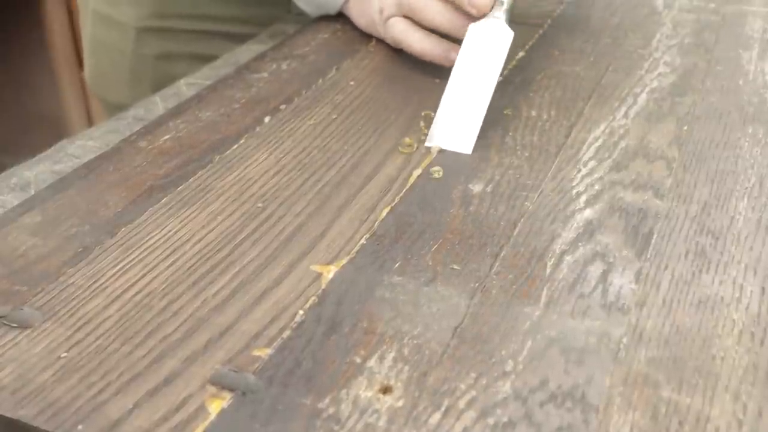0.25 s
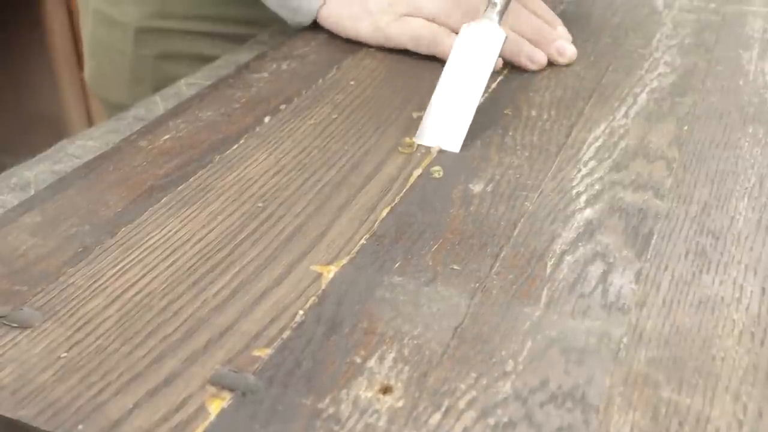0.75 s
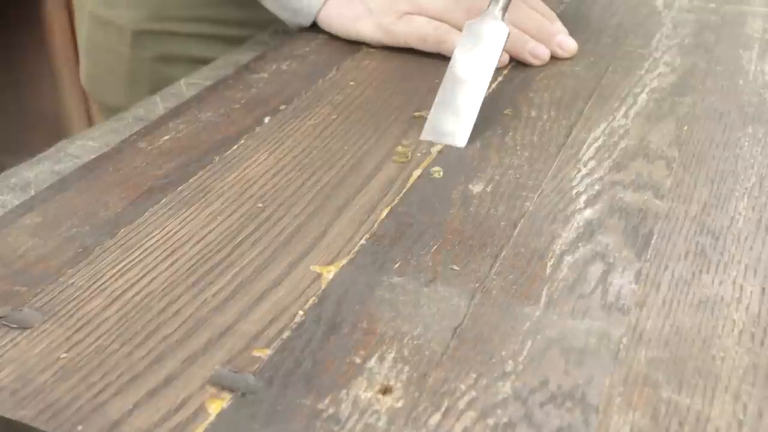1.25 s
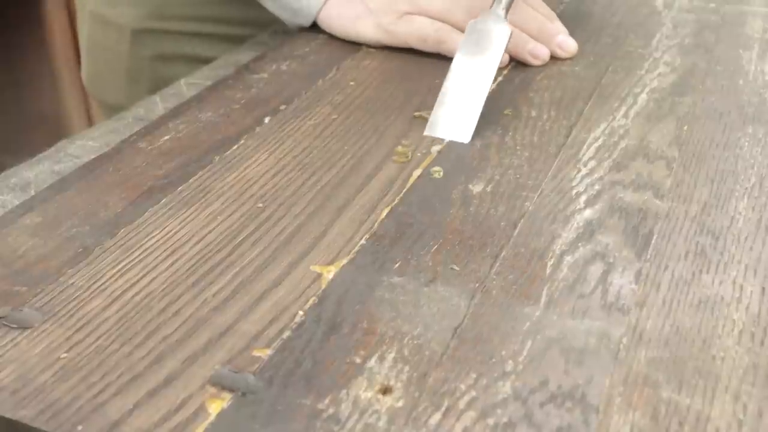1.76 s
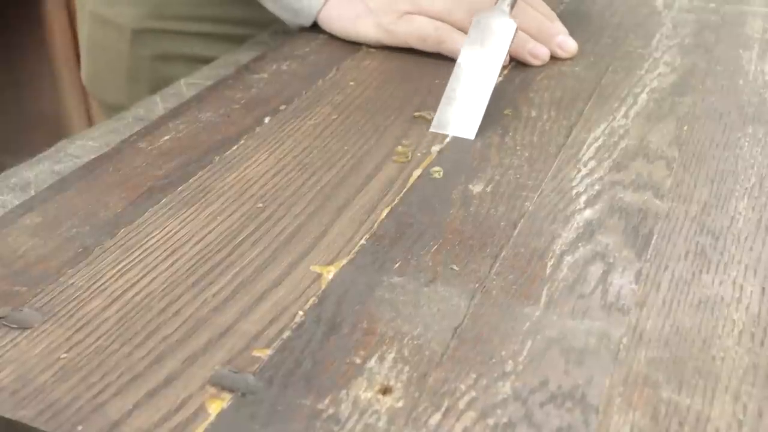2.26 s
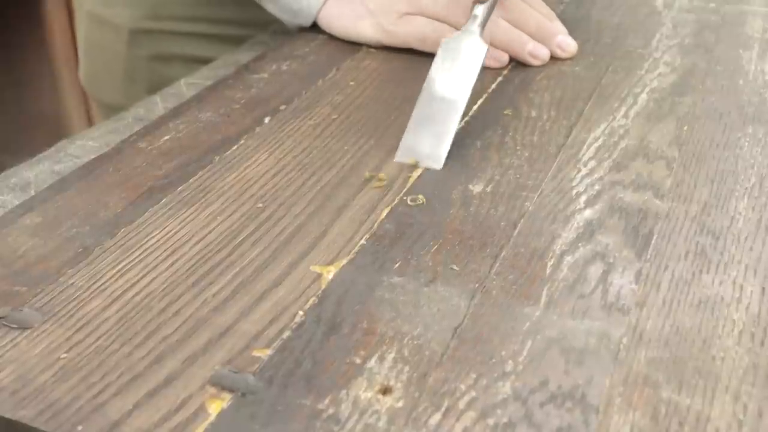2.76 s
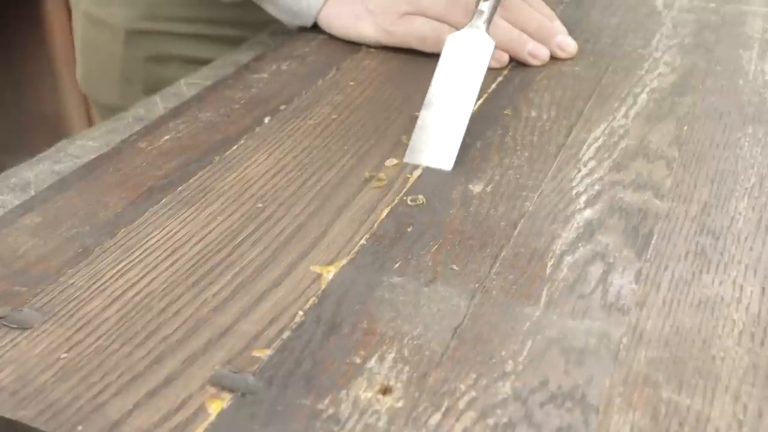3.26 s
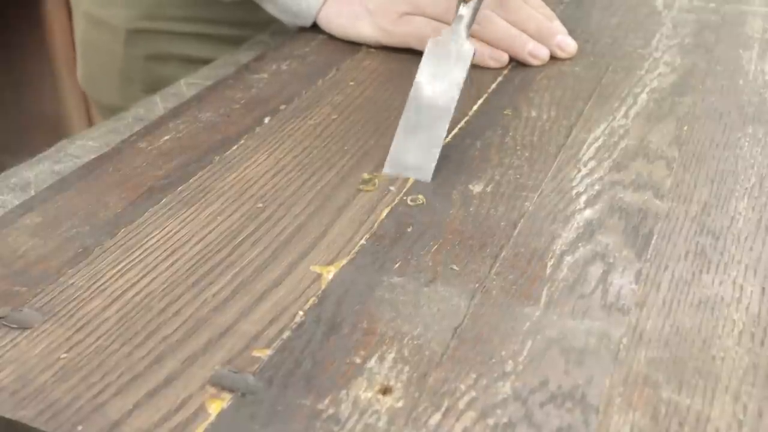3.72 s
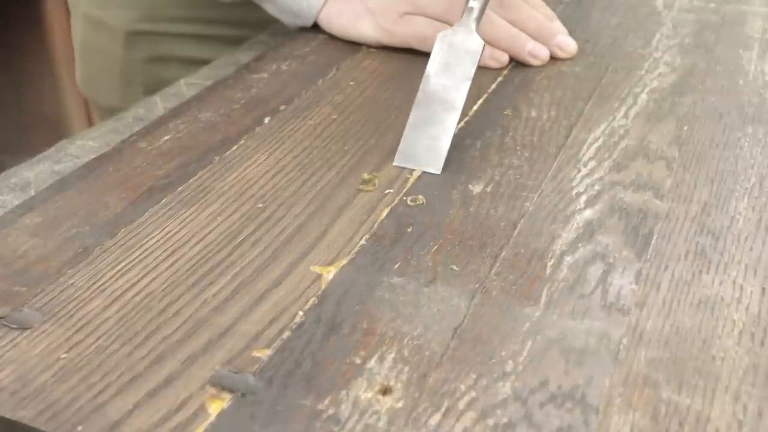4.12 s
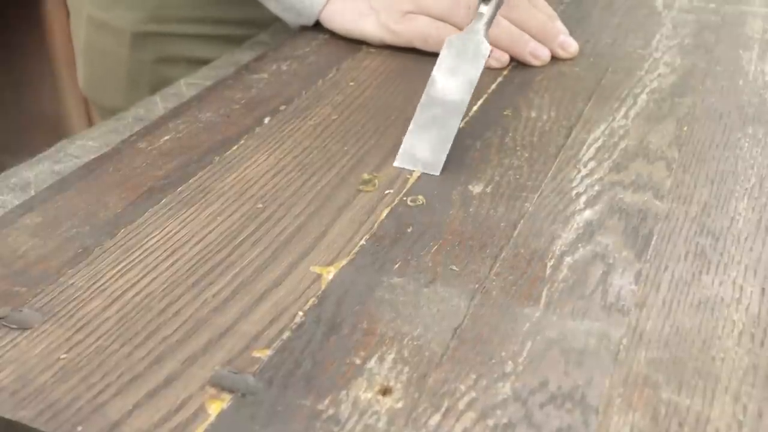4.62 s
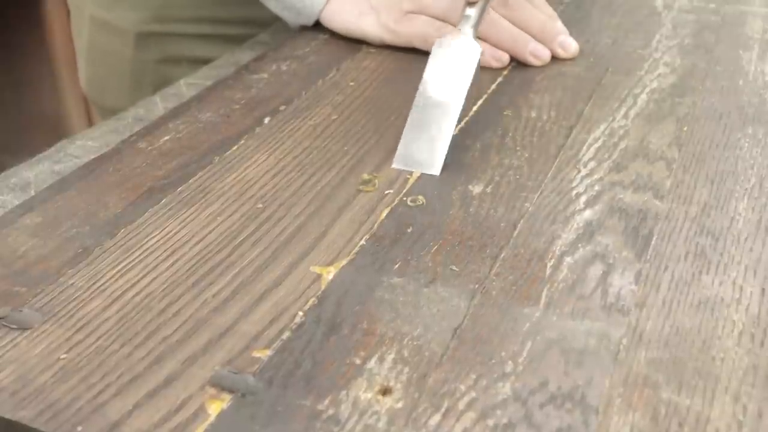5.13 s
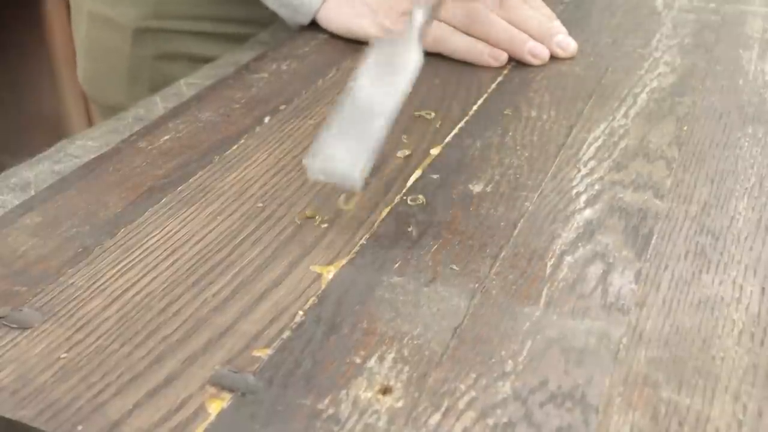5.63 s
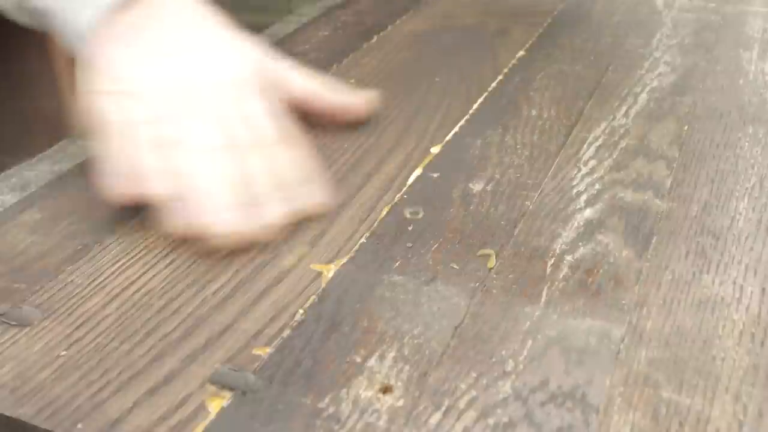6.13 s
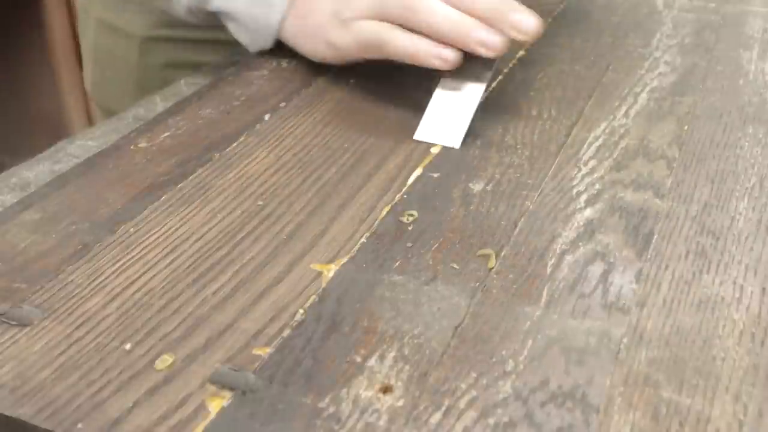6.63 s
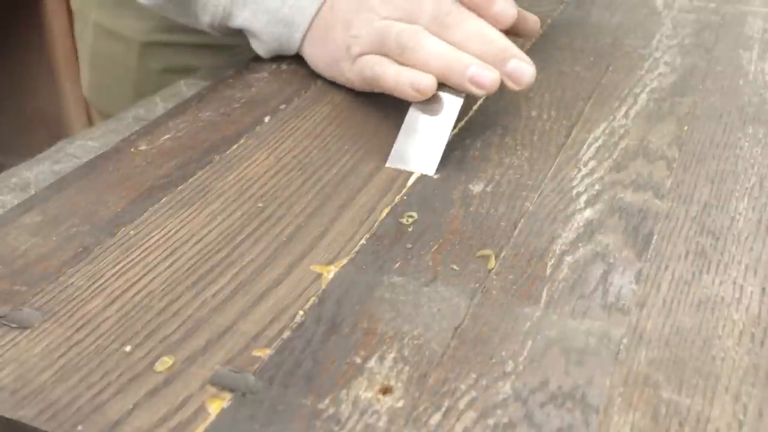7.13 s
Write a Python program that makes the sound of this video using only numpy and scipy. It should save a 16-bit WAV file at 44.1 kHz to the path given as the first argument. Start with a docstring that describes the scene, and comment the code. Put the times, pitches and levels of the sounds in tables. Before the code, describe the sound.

A steel scraper knocks and rasps in quick, regular strokes on a hollow wooden board, then slows, breaks free, and a palm brushes crumbs away.

```python
"""Scraping dried glue off a table leaf

A steel blade is pushed again and again into a bead of dried glue on a wooden leaf: it rasps, knocks and is
dragged back. Gritty noise and short strokes ring a bank of board modes; glue snaps and crumbles as bright noise.
Later the table booms once, as a dying low tone, and a palm sweeps the crumbs away, as swelling hiss.
A workshop hums behind in shaped noise; two close microphone ports hear it all almost alike."""
import sys
import numpy as np
from scipy import signal
from scipy.fft import rfft, irfft, next_fast_len
from scipy.io import wavfile
from scipy.ndimage import uniform_filter1d, map_coordinates

SR = 44100
rng = np.random.default_rng(int(sys.argv[2]) if len(sys.argv) > 2 else 0)


def file_out(sig):
    """Save sig as 16-bit WAV at sys.argv[1]."""
    # one column per channel
    cols = np.atleast_2d(sig).T
    # limit, then scale
    lim = np.clip(cols, -1, 1)
    pcm = np.round(lim * 32767).astype(np.int16)
    wavfile.write(sys.argv[1], SR, pcm)


N = 325458  # length in samples


def amp(db):
    """Turn dB into an amplitude factor."""
    return 10 ** (np.asarray(db) / 20)


def unit(x):
    """Scale a signal to an rms of 1."""
    return x / np.sqrt(np.mean(x ** 2) + 1e-20)


def along(points, hz):
    """Read a curve of (Hz, value) points at the given frequencies, on a log frequency axis."""
    f, v = np.transpose(points)
    return np.interp(np.log(hz + 1), np.log(f + 1), v)


def wobble(rate):
    """A smooth random curve with this many random knots a second."""
    knots = rng.standard_normal(int(N * rate / SR) + 4)
    return map_coordinates(knots, [np.arange(N) * rate / SR])


def filtered(x, response):
    """Multiply the spectrum of x by a complex response, given as a function of frequency."""
    n = x.shape[-1]
    m = next_fast_len(n + SR // 8)  # spare room for the ringing
    spectrum = rfft(x, m) * response(np.fft.rfftfreq(m, 1 / SR))
    return irfft(spectrum, m)[..., :n]


def coloured(spectrum, size):
    """Noise of rms 1, shaped by a spectrum of (Hz, dB) points."""
    noise = rng.standard_normal(size)
    return unit(filtered(noise, lambda hz: amp(along(spectrum, hz))))


def grit(size, spiky_db):
    """The edge skips over wood grain: noise whose samples scatter widely in size, in short clumps."""
    clumps = uniform_filter1d(rng.standard_normal(size), size=40)
    return unit(rng.standard_normal(size) * amp(spiky_db * unit(clumps)))


# The room's background noise. Each row: frequency in Hz, relative density in dB per Hz.
SHOP_SPECTRUM = [(15, -71.5), (25, -38.5), (124, -28), (140, -10), (188, -1.5), (241, -11.5), (286, -6),
                 (385, -13.5), (446, -10.5), (712, -16), (1080, -16.5), (1820, -24), (3280, -25.5),
                 (9000, -51.5), (11700, -80.5), (19800, -120)]


def shop():
    """The workshop's steady hum and rush: shaped noise with a slightly uneven level."""
    uneven_db = 0.8 * wobble(3.2) + 1.1 * wobble(31)
    return amp(-60.0 + uneven_db) * coloured(SHOP_SPECTRUM, N)


# The ways the wooden leaf can ring. Each row: frequency in Hz, width in Hz before the hand's damping,
# level in dB relative to the other modes of its family.
BOARD_MODES = [(154.5, 47, -16), (202.7, 47, -9.5), (256.8, 33.3, -2), (310.4, 49.2, -7.5),
               (351, 14.2, -0.5), (423.3, 56.4, -0.5), (498.8, 32.6, 0), (640, 52, -11.5), (902, 89, -6),
               (1091.6, 59, -8.5), (1170, 41, -5), (1338, 16, -22), (1494, 27, -21.5), (1681, 29.7, -23.5),
               (1848, 15, -20.5), (2074, 88, -16.5), (2496, 48, -23.5), (3010, 160, -30.5),
               (3458, 130, -28.5), (3896, 73, -32)]


def board(families_db, scatter_db):
    """The leaf's response in four families of modes, each passing white noise at its own level in dB.

    Every spot reaches the modes at other strengths, so their levels scatter at random."""
    hz, width, db = np.transpose(BOARD_MODES)[:, :, None]
    db = db + scatter_db * rng.standard_normal(hz.shape)
    width = np.maximum(width, 20 + hz / 50)  # the hand on the leaf damps: no mode is narrower than this
    family = np.searchsorted([340, 750, 1400], hz)  # deep, middle, high, top; limits in Hz
    mode_power = amp(2 * db) * np.pi * width / SR
    power = np.bincount(family[:, 0], mode_power[:, 0])
    sign = (-1.) ** np.arange(len(hz))[:, None]  # neighbours swing in opposite directions
    gain = sign * amp(db + np.take(families_db, family)) / np.sqrt(power[family])
    # the microphone passes little bass and little treble
    microphone = signal.butter(3, [135, 4300], "band", fs=SR)

    def response(f):
        modes = gain * 1j * f * width / (hz * hz - f * f + 1j * f * width)
        return signal.freqz(*microphone, f, fs=SR)[1] * np.sum(modes, axis=0)

    return response


# The blade sliding, in three separate stretches. Each row: time in seconds, pressure as a level in dB.
DRAG_PRESSURE = [
    [(0.0, -29.5), (0.13, -51), (0.53, -54.5), (1.04, -52.5), (1.36, -46.5), (1.71, -56.5), (1.84, -47),
     (2.16, -57), (2.39, -39), (2.6, -57), (2.93, -46), (3.26, -58.5), (3.44, -51.5), (3.67, -47),
     (3.85, -62.5), (4.35, -75)],
    [(5.56, -66), (5.638, -45.5), (5.8, -82)],
    [(6.58, -62), (6.77, -79), (6.854, -56.5), (7.268, -70), (7.38, -33.5)],
]
# Level of the upper modes at a pressure of -50 dB, then dB gained per dB of pressure.
DRAG_HIGH_DB, DRAG_HIGH_GROWS = -62.5, 0.94


def drag():
    """The sliding blade keeps the board murmuring unevenly; more pressure also raises the upper modes."""
    pressure = np.zeros(N)
    for stretch in DRAG_PRESSURE:
        s, db = np.transpose(stretch)
        pressure += amp(np.interp(np.arange(N) / SR, s, db, left=-150, right=-150))  # silent outside
    high = amp(DRAG_HIGH_DB) * (pressure / amp(-50)) ** DRAG_HIGH_GROWS
    rub = grit(N, spiky_db=3) * amp(3 * wobble(60))
    # -120 dB switches a family off
    low_modes = filtered(rub, board([-3, -3, -120, -120], scatter_db=0))
    high_modes = filtered(rub, board([-120, -120, -1.5, -6], scatter_db=0))
    return pressure * low_modes + high * high_modes


TOP_UNDER_HIGH_DB, TOP_FOLLOWS_HARDNESS = 5, 1.18  # the second in dB per dB of hardness


def families(strength_db, depth_db, hardness_db):
    """Levels of the deep, middle, high and top modes: depth lifts the deep ones, hardness the upper two."""
    top_db = strength_db + TOP_FOLLOWS_HARDNESS * hardness_db - TOP_UNDER_HIGH_DB
    return [strength_db + depth_db, strength_db, strength_db + hardness_db, top_db]


def driven(force, families_db):
    """The board under a short force; however the grains fall, a stroke hands over a set energy."""
    response = board(families_db, scatter_db=2.5)
    ring = filtered(force, response)
    single_click = np.arange(len(force)) == 0
    typical = np.linalg.norm(filtered(single_click, response))
    return ring * typical * np.linalg.norm(force) / np.linalg.norm(ring)


# The edge bites along the grain. Each row: start in seconds, length in seconds, strength in dB,
# depth in dB, hardness in dB.
GRAIN_RASPS = [(0.089, 0.073, -48, 2.1, -20), (0.141, 0.025, -42, -3, -2), (0.625, 0.03, -38.5, -4.5, -7),
               (0.353, 0.055, -59.5, 0.5, 2), (0.536, 0.18, -56, -3, -5.5),
               (1.072, 0.072, -46.5, 0.5, -9.5), (1.309, 0.053, -41.5, -0.5, -5),
               (1.546, 0.051, -54, 13, 2.5), (2.396, 0.036, -42.5, 5, -5), (2.525, 0.037, -39, 7.5, -1),
               (2.596, 0.044, -59, -7, 2), (2.714, 0.028, -28.5, 1.5, -7.5), (2.867, 0.019, -51, 15, -4),
               (2.946, 0.019, -35.5, 5, -22), (2.971, 0.029, -40, 10, -4), (3.051, 0.027, -58.5, 13, -3.5),
               (3.422, 0.045, -39, -1.5, -13), (3.474, 0.025, -49.5, 11.5, 1),
               (3.563, 0.021, -34.5, 1, -8.5), (3.665, 0.062, -36.5, 5, -12), (3.772, 0.067, -47.5, 7, -2),
               (4.031, 0.039, -66.5, 16, 5), (5.523, 0.065, -29, -3, -3.5), (5.566, 0.0377, -39, -15, -5),
               (6.847, 0.054, -39, 1, -12), (6.996, 0.01, -54, 12, -18), (7.08, 0.089, -59.5, 17, -5.5),
               (7.328, 0.045, -48.5, 2, 2)]
# A rasp up to the bead, then a knock. Each row: knock time in seconds, run-up in seconds,
# knock strength in dB, knock depth in dB, knock hardness in dB, hardness of the rasp in dB.
PUSH_STROKES = [(0.04, 0.031, -32.5, -1.5, -2, 2.5), (0.254, 0.04, -29, -8, -6.5, -8),
                (0.497, 0.017, -31, 1, -7.5, -20.5), (0.742, 0.036, -30, -1.5, -4, -13),
                (0.972, 0.031, -27.5, -4.5, -7, -12.5), (1.204, 0.033, -27, -0.7, -5.5, -4),
                (1.443, 0.043, -26.5, -4, -8, -8), (1.668, 0.032, -24.5, -2.5, -9.5, -8),
                (1.905, 0.034, -22.5, -6, -12, -9.5), (2.14, 0.032, -22.5, -6, -16, -10.5),
                (2.382, 0.041, -25, -4.8, -7.5, -8), (4.12, 0.014, -32, -2.5, -4.5, -23)]
# Colour of cracking glue. Each row: frequency in Hz, relative density in dB per Hz.
SNAP_SPECTRUM = [(600, -39.5), (2500, -2), (4500, 5), (8000, -2.5), (15500, -13.5)]
# The rasp of a push against its knock, in dB; then its length as a multiple of the run-up.
RUN_UP_DB, RUN_UP_DEPTH_DB, RUN_UP_LASTS = -6, 4.5, 1.05
# Treble of a rasp when the high modes are at -40 dB; dB gained per dB of those modes.
FIZZ_DB, FIZZ_GROWS = -70, 0.95


def rasps():
    """Gritty force rings the board for the length of the bite, swelling to a late peak, with treble fizz."""
    t = np.arange(SR // 6) / SR
    out = np.zeros(N + len(t))
    run_ups = [(s - run, RUN_UP_LASTS * run, db + RUN_UP_DB, depth + RUN_UP_DEPTH_DB, hard)
               for s, run, db, depth, _, hard in PUSH_STROKES]
    for s, length, *touch_db in GRAIN_RASPS + run_ups:
        families_db = families(*touch_db)
        swell = np.sin(np.pi * np.clip(t / length, 0, 1) ** 1.2) ** 1.1
        bite = swell * (t < length)
        grains = bite * grit(len(t), spiky_db=4.0)
        force = grains * np.linalg.norm(bite) / np.linalg.norm(grains)
        ring = driven(force, families_db)
        high_over_db = families_db[2] + 40
        fizz = amp(FIZZ_DB + FIZZ_GROWS * high_over_db) * bite * coloured(SNAP_SPECTRUM, len(t))
        out[round(s * SR):][:len(t)] += ring + fizz
    return out[:N]


# The edge hits glue or wood; some of these knocks follow a rasp listed in GRAIN_RASPS.
# Each row: time in seconds, strength in dB, depth in dB, hardness in dB.
OTHER_KNOCKS = [(0.853, -50, 4.5, -6), (0.88, -39.5, -17.5, -8.5), (1.106, -36.5, -16, -10),
                (1.331, -46.5, 3.5, -6.5), (1.789, -42, -4, -15), (1.809, -38.5, -18, -8),
                (2.03, -43.5, 4.5, -12), (2.055, -42, 0.5, -7.5), (2.27, -40.5, 5, -11),
                (2.292, -40, -15, -7), (2.393, -32.5, 6.5, 0), (2.428, -45, 12, -2),
                (2.508, -35, 3.5, -0.5), (2.7, -42.5, 9, -10), (2.729, -52, 4, 1), (2.76, -44.5, 1, -11.5),
                (3.099, -41.5, 6.7, -13), (3.2, -37, -6.5, -19.5), (3.319, -56.5, 14.5, -20),
                (3.442, -34, 0, -6.5), (3.551, -49, 12, -1), (3.57, -43, 12, -3.5), (3.682, -36.5, 2, -14),
                (3.702, -43.5, 0, -7.5), (5.143, -54.5, -16, -5), (5.481, -57, 10, -4),
                (6.564, -30.5, -2.5, 0), (6.622, -52, -1, -8), (7.129, -46.5, -21, -32),
                (7.216, -51.5, 9, -11), (7.328, -37.5, -2.5, -42), (7.349, -41, -3, -16)]
# Treble of a knock when the high modes are at -40 dB; dB gained per dB of those modes.
SNAP_DB, SNAP_GROWS = -69, 0.51


def knocks():
    """The edge digs in over milliseconds: a push, a scatter of smaller slips around it, a snap of glue."""
    lead = SR // 200  # samples kept before the hit, for the early slips
    t = np.arange(-lead, SR // 10) / SR
    out = np.zeros(N + len(t))
    dig = np.exp(np.where(t < 0, t / 0.0003, -t / 0.0069))
    late_dig = np.roll(dig, SR // 500)  # the snap comes 2 ms later
    push_knocks = [(s, *touch_db) for s, _, *touch_db, _ in PUSH_STROKES]
    for s, *touch_db in OTHER_KNOCKS + push_knocks:
        families_db = families(*touch_db)
        slips = 0.038 * dig * grit(len(t), spiky_db=6.5)
        soft = 1 / (1 + np.exp(-(t - .001) / .0008))  # glue and wood give way, so the ring builds up
        ring = amp(29.0) * soft * driven((t == 0) + slips, families_db)
        # a faint push of bass
        jolt = amp(families_db[1] - 40.0) * np.exp(-.5 * ((t - .004) / 0.0077) ** 2)
        high_over_db = families_db[2] + 40
        snap = amp(SNAP_DB + SNAP_GROWS * high_over_db) * late_dig * coloured(SNAP_SPECTRUM, len(t))
        out[round(s * SR):][:len(t)] += ring + jolt + snap
    return out[lead:][:N]


# A lump of glue crumbles off. Each row: start in seconds, crumbling time in seconds, level in dB.
GLUE_CRACKS = [(0.042, 0.0076, -56.5), (2.382, 0.0063, -45), (2.397, 0.0059, -50), (2.51, 0.0072, -59.5),
               (2.731, 0.012, -69.5), (3.81, 0.012, -67), (5.535, 0.047, -58.5), (5.59, 0.016, -63),
               (6.567, 0.0043, -51), (6.869, 0.015, -78), (7.348, 0.029, -69.5)]
# Colour of crumbling glue. Each row: frequency in Hz, relative density in dB per Hz.
SHARD_SPECTRUM = [(600, -39), (2500, -2.5), (4500, 5.5), (8000, -5), (12000, -9), (15500, -10)]


def cracks():
    """Dried glue shatters: a bright gritty burst that starts fast and crumbles away."""
    t = np.arange(SR // 8) / SR
    out = np.zeros(N + len(t))
    for s, crumble, db in GLUE_CRACKS:
        burst = (1 - np.exp(-t / (0.15 * crumble))) * np.exp(-t / crumble)
        clumps = unit(uniform_filter1d(rng.standard_normal(len(t)), size=60))
        grains = amp(2.5 * clumps)
        out[round(s * SR):][:len(t)] += amp(db) * burst * grains * coloured(SHARD_SPECTRUM, len(t))
    return out[:N]


# The whole table shudders when the blade breaks free. The one row: start in seconds, frequency in Hz,
# time to fall by 60 dB in seconds, level in dB before the soft swell.
TABLE_BOOM = (5.56, 64, .6, -65)


def boom():
    """One low mode of the table that swells softly and dies slowly."""
    s, hz, t60, db = TABLE_BOOM
    t = np.clip(np.arange(N) / SR - s, 0, None)
    swell = 1 - np.exp(-t / 0.027)
    return amp(db - 60 * t / t60) * swell * np.sin(2 * np.pi * hz * t)


# Colour of skin on wood. Each row: frequency in Hz, relative density in dB per Hz.
SKIN_SPECTRUM = [(530, -41), (900, -13), (1120, -8), (1200, 2.5), (1780, 0.5), (2840, -1), (12800, -20),
                 (15700, -21)]
PALM_S, PALM_HOLD_S = 6.048, 0.14  # loudest moment, then still touching
# Level at that moment; slopes of the swell and the sag; the lift's slope adds to the sag.
PALM_DB, PALM_RISE_DB_PER_S, PALM_SAG_DB_PER_S, PALM_FALL_DB_PER_S = -59, 121, 30, 330


def palm():
    """Skin and crumbs hiss over the wood: a swell, a sagging hold, a quick lift."""
    t = np.arange(N) / SR - PALM_S
    fall_db = PALM_SAG_DB_PER_S * t + PALM_FALL_DB_PER_S * np.clip(t - PALM_HOLD_S, 0, None)
    level_db = PALM_DB + np.where(t < 0, PALM_RISE_DB_PER_S * t, -fall_db)
    return amp(level_db + 1.7 * wobble(60)) * coloured(SKIN_SPECTRUM, N)


# How fast the room's answer dies. Each row: frequency in Hz, time to fall by 60 dB in seconds.
WALL_DECAY = [(100, 0.47), (300, 0.55), (800, 0.24), (2000, 0.28), (6000, 0.13)]


def walls(x):
    """The room answers with a noise tail in which each frequency dies at its own speed."""
    hz, t, z = signal.stft(rng.standard_normal(SR // 2), SR, nperseg=256)
    decay = amp(-60 * t / along(WALL_DECAY, hz)[:, None])
    tail = signal.istft(z * decay, SR, nperseg=256)[1]
    late = np.pad(x, (400, 0))  # 400 samples, about 9 ms
    return signal.fftconvolve(late, tail / np.linalg.norm(tail))[:N]


def roomy(x):
    """The direct sound and the room's weaker answer."""
    return x + amp(-16) * walls(x)


def scene():
    """The blade, the glue, the table and the palm sound in the room; the shop is added; two equal ports."""
    table = drag() + rasps() + knocks() + cracks() + boom() + palm()
    return roomy(table) + shop() + np.zeros((2, 1))


# Noise of each port alone. Each row: frequency in Hz, relative density in dB per Hz.
HISS_SPECTRUM = [(20, 9), (90, 8), (160, -14.5), (600, -18.5), (3000, 1.5), (15700, 11)]
# The left port behind the right. Each row: frequency in Hz, lag in seconds.
PORT_LAG = [(180, 1.3e-5), (350, 1.8e-5), (600, 1.9e-5), (1200, 2.3e-5), (15000, 2.4e-5)]
TOP_HZ = 15800  # band limit


def record(dry):
    """The left port hears a little later, each adds its own hiss; nothing passes above the band limit."""
    edge = SR // 20
    hiss = amp(-80) * np.array([coloured(HISS_SPECTRUM, N + 2 * edge) for _ in range(2)])
    air = np.pad(dry, ((0, 0), (edge, edge)), "reflect")  # the sound goes on before and after
    side = np.array([[1], [-1]])  # left is half the lag late, right half the lag early
    ports = filtered(air, lambda hz: np.exp(-1j * np.pi * hz * along(PORT_LAG, hz) * side))
    return filtered(ports + hiss, lambda hz: hz < TOP_HZ)[:, edge:-edge]


dry = scene()
out = record(dry)
file_out(out)
```